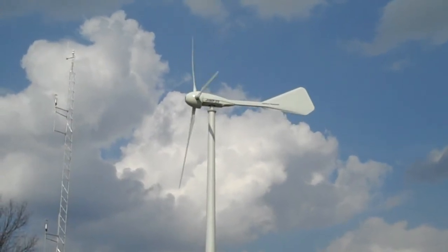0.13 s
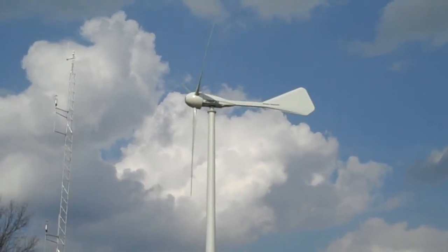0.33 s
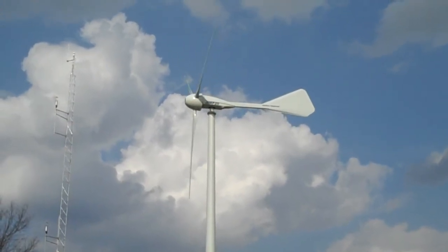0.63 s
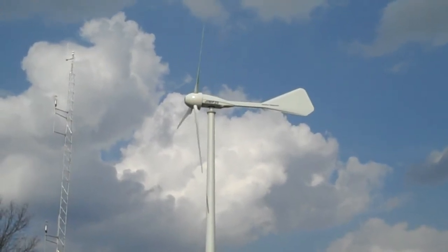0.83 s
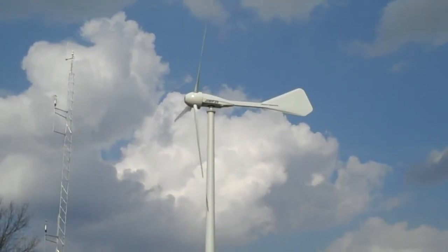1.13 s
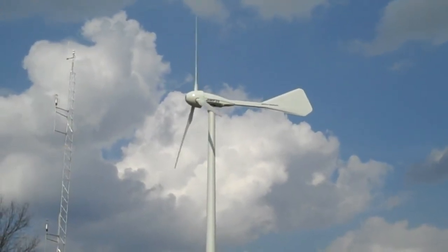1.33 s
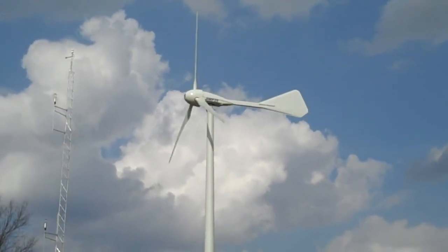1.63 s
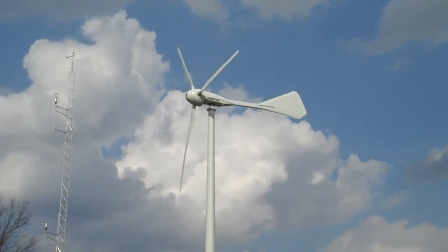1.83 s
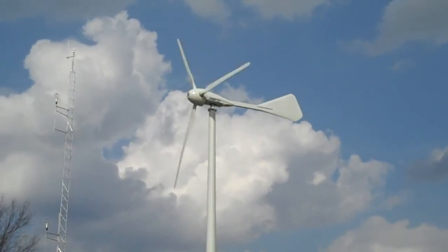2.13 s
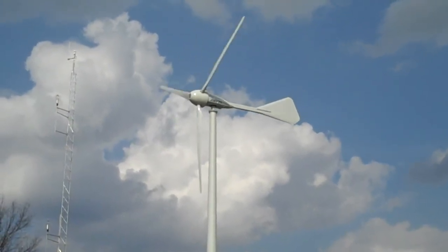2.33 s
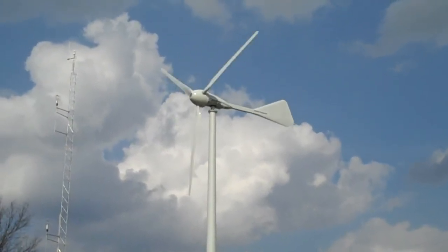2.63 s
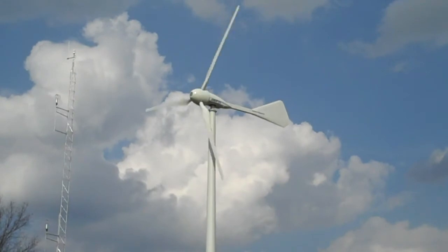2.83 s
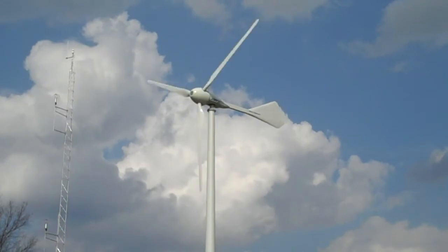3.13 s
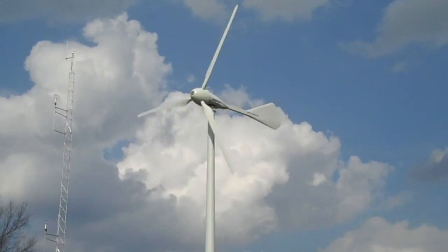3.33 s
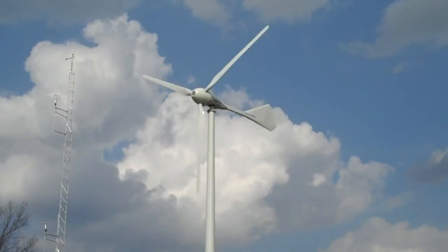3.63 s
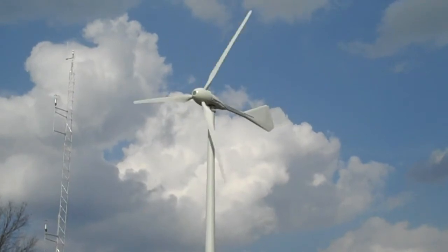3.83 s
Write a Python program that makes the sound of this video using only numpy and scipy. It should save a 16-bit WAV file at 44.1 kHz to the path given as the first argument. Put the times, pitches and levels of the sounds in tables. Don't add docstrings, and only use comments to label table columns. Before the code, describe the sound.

Gusty wind rumbles and flutters against a stereo microphone outdoors, over faint early turbine swishes and bird whistles; the hardest gust makes a sharp click on the left, then it calms and birdsong stands out.

```python
import sys
import numpy as np
from scipy import signal
from scipy.fft import rfft, irfft
from scipy.io import wavfile
from scipy.ndimage import uniform_filter1d, map_coordinates

SR = 44100
rng = np.random.default_rng(int(sys.argv[2]) if len(sys.argv) > 2 else 0)


def master_out(mix):
    frames = np.transpose(np.atleast_2d(mix))
    ceiling = np.clip(frames, -1, 1)
    pcm = np.round(ceiling * 32767).astype(np.int16)
    wavfile.write(sys.argv[1], SR, pcm)


def ratio_of_db(decibels):
    return 10 ** (np.asarray(decibels, float) / 20)


N = 176400


def evened(x):
    return x / np.sqrt(np.mean(x ** 2) + 1e-20)


def read(points, hz):
    f, value = np.transpose(points)
    return np.interp(np.log(hz + 1), np.log(f + 1), value)


def add(mix, s, sound):
    part = mix[:, round(s * SR):][:, :sound.shape[1]]
    part += sound[:, :part.shape[1]]


def smooth_twice(x, span):
    return uniform_filter1d(uniform_filter1d(x, span), span)


def slow(hz, count=N):
    span = max(int(SR / hz), 1)
    return evened(smooth_twice(rng.standard_normal(count), span))


def resonate(x, hz, width):
    turn = np.exp(2j * np.pi * np.cumsum(hz * np.ones(len(x))) / SR)
    r = np.exp(-np.pi * width / SR)
    return 2 * (turn * signal.lfilter([1 - r], [1, -r], x / turn)).real


def ringing_noise(count, hz, width):
    once = resonate(rng.standard_normal(count), hz, width)
    return evened(resonate(once, hz, width))


def buffet(gusts, puffs, flicks, column):
    # t/s, left level/dB, right level/dB
    breeze = [
        (0, -27, -31.5),
        (0.6, -29, -33),
        (0.999, -22, -32),
        (1.619, -22, -33),
        (1.75, -37, -38),
        (2.102, -38, -34),
        (2.35, -35, -25.5),
        (2.6, -37.5, -37),
        (4, -41.5, -39),
    ]
    # f/Hz, level/dB per Hz
    eddy_spectrum = [(15, -13.5), (55, -1.5), (130, -4), (300, -15), (800, -34), (3000, -85)]
    calm_db = -30
    t, table = np.arange(N) / SR, np.array(breeze)
    power = ratio_of_db(2 * (np.interp(t, table[:, 0], table[:, column]) + 2.0 * slow(39)))
    puff_s = .025
    for s, db, wide in gusts + [(s, db, puff_s) for s, db in puffs]:
        power = power + ratio_of_db(2 * db) * np.exp(-(2.2 * (t - s) / wide) ** 2)
    power = power * ratio_of_db(2 * 2.8 * (slow(110) - .7))

    speed = (np.sqrt(power) / ratio_of_db(calm_db)) ** .17 * ratio_of_db(2.5 * slow(60.4))
    flick_s, flick_db = .005, -8.5
    for s, db in flicks:
        snap = np.exp(-((t - s) / flick_s) ** 2)
        speed = speed + 1.5 * ratio_of_db(.3 * (db - calm_db)) * snap
        power = power + ratio_of_db(2 * (db + flick_db)) * snap

    size = 2 * N
    color = ratio_of_db(read(eddy_spectrum, np.fft.rfftfreq(size, 1 / SR)))
    eddies = irfft(rfft(rng.standard_normal(size)) * color, size)
    swept = evened(map_coordinates(eddies, [np.cumsum(speed)], order=2, mode="wrap"))
    local = smooth_twice(swept ** 2, 300)
    return np.sqrt(power) * evened(swept / (abs(local) + 0.018) ** (.6 / 2))


def rumble():
    ports = [evened(resonate(rng.standard_normal(N), 56, 29)) for _ in range(2)]
    return ratio_of_db(-38) * np.array(ports)


def roar():
    # f/Hz, level/dB per Hz
    roar_spectrum = [(150, -6.5), (400, -5), (1100, -11), (3400, -20.5), (5800, -14.5), (8000, -22.5),
                     (10000, -41), (14000, -54)]
    # f/Hz, share/0..1
    likeness = [(300, 1), (1400, 0.96), (4500, 0)]
    frames, hz = N // 128 + 5, np.fft.rfftfreq(512, 1 / SR)
    a, b, c, d, patches = rng.standard_normal((frames, 257, 5)).T
    patches = evened(uniform_filter1d(uniform_filter1d(patches, 6, 0), 16, 1))
    same = np.clip(read(likeness, hz), -1, 1)[:, None]
    left = a + 1j * b
    right = same * left + np.sqrt(1 - same ** 2) * (c + 1j * d)
    in_range = ((hz > 120) & (hz < 14200))[:, None]
    patchy = ratio_of_db(read(roar_spectrum, hz)[:, None] + 2.5 * patches)
    z = np.array([left, right]) * patchy * in_range
    air = signal.istft(z, nperseg=512, noverlap=384)[1][:, :N]
    return ratio_of_db(-42) * evened(air)


def trees():
    level = ratio_of_db(-59 + 0.53 * slow(24))
    return ratio_of_db([[-9], [0]]) * level * ringing_noise(N, 5550, 460)


def blades():
    # f/Hz, width/Hz, level/dB
    swish = [
        (1028, 320, -40),
        (1472, 104, -45.5),
        (1750, 185, -40),
        (1270, 780, -42),
    ]
    passes_per_s, first_pass_s, turn_away_s = 3.5, .18, 1.1
    t = np.arange(N) / SR
    away = .5 - .5 * np.cos(2 * np.pi * passes_per_s * (t - first_pass_s))
    yaw_db = -13 * np.clip((t - turn_away_s) / 0.46, 0, 2)
    level = ratio_of_db(-9 * away ** 2 - 5 * t + yaw_db)
    tones = 0
    for hz, wide, db in swish:
        f = hz * (1 - .1 * away ** 2 + 0.027 * slow(8.8))
        tones = tones + ratio_of_db(db + 3.0 * slow(11)) * ringing_noise(N, f, wide)
    return level * tones


def whistle(hz, db, pan_db, soft_s=.01):
    count = len(hz)
    t = np.arange(count) / SR
    ends = np.clip(np.minimum(t, t[::-1]) / soft_s, 0, 1)
    turns = 2 * np.pi * np.cumsum(hz * (1 + .003 * slow(70, count))) / SR
    fade_db = db + 3.5 + 1.2 * slow(25, count)
    left_db = fade_db + pan_db / 2 + 1.5 * slow(40, count)
    right_db = fade_db - pan_db / 2
    lag = np.pi * (.35 + .3 * rng.random())
    return np.sqrt(2) * ends * ratio_of_db([left_db, right_db]) * np.sin(turns + [[0], [lag]])


def notes_sung(out):
    # start t/s, length/s, first f/Hz, last f/Hz, level/dB
    short_notes = [(.005, .125, 5970, 5830, -52), (1.055, .025, 4220, 3760, -52),
                   (1.08, .025, 3700, 3600, -53), (1.965, .06, 5760, 5500, -50),
                   (2.03, .085, 5850, 5500, -54), (2.2, .24, 5430, 5330, -57),
                   (2.885, .055, 5950, 6260, -53), (3.24, .125, 3580, 3260, -50),
                   (3.41, .04, 2120, 2160, -49), (3.93, .05, 7350, 6910, -51), (3.6, .14, 3550, 3275, -57),
                   (3.86, .065, 4130, 4250, -54), (3.79, .08, 2420, 2330, -54), (3.2, .17, 2350, 2650, -56),
                   (2.8, .04, 4150, 4280, -55), (1.81, .09, 2380, 2330, -56),
                   (2.475, .025, 2370, 2300, -50)]
    for s, length, first_hz, last_hz, db in short_notes:
        add(out, s, whistle(np.linspace(first_hz, last_hz, int(length * SR)), db, -4.1))


def slurs(out):
    # t/s, f/Hz, level/dB
    slur_paths = [
        [(.33, 6240, -58), (.394, 5735, -60), (.42, 5430, -49), (.47, 5120, -58), (.54, 4700, -61),
         (.64, 4300, -54), (.71, 4150, -67), (.77, 3950, -53), (.826, 3915, -51), (.86, 3900, -58),
         (.95, 3620, -56)],
        [(1.19, 7060, -56), (1.24, 6915, -50), (1.26, 6580, -56), (1.316, 5450, -59), (1.36, 4550, -58)],
        [(1.21, 7315, -55), (1.29, 7050, -51), (1.31, 6500, -60), (1.34, 5950, -51), (1.386, 5230, -59),
         (1.514, 4550, -58), (1.545, 4450, -69), (1.6, 4245, -58), (1.616, 4570, -56), (1.65, 4330, -56),
         (1.78, 3900, -56), (1.85, 3740, -62), (1.87, 3420, -55), (1.915, 3330, -55), (2, 3400, -53)],
        [(1.14, 5130, -61), (1.2, 4600, -57), (1.235, 3780, -54), (1.25, 3670, -46), (1.316, 3420, -49),
         (1.34, 3280, -56)],
        [(2.14, 5800, -61), (2.16, 5580, -51), (2.34, 4576, -47), (2.4, 4216, -53), (2.47, 4084, -60)],
    ]
    # t/s, f/Hz, level/dB
    more_slur_paths = [
        [(2.68, 2305, -59), (2.724, 2340, -51), (2.758, 2560, -49), (2.778, 2440, -48), (2.868, 2607, -45),
         (2.9, 2560, -48), (3.01, 2610, -58), (3.025, 2703, -54), (3.1, 2776, -60)],
        [(3.37, 7224, -61), (3.406, 7203, -53), (3.462, 7126, -52), (3.5, 6700, -59), (3.556, 5892, -51),
         (3.62, 5313, -44), (3.652, 5380, -54), (3.682, 4986, -50), (3.74, 4603, -49), (3.766, 4864, -51),
         (3.78, 4670, -51), (3.82, 4400, -62)],
        [(3.015, 3900, -58), (3.044, 3524, -47), (3.08, 3630, -54)],
        [(3.83, 5895, -56), (3.868, 5934, -50), (3.9, 5780, -59), (3.934, 5731, -54), (3.99, 5650, -58)],
        [(1.42, 5536, -64), (1.52, 5460, -58), (1.552, 5520, -45), (1.59, 5531, -43), (1.61, 5466, -57)],
        [(3.13, 4268, -58), (3.186, 4155, -54), (3.22, 4316, -50), (3.238, 4600, -50)],
        [(2.105, 2450, -52), (2.125, 2560, -46), (2.16, 2330, -44), (2.205, 2200, -45), (2.22, 2000, -54)],
    ]
    for rows in slur_paths + more_slur_paths:
        s, hz, db = np.transpose(rows)
        t = np.arange(s[0], s[-1], 1 / SR)
        glide = uniform_filter1d(np.interp(t, s, hz), 350, mode="nearest")
        add(out, s[0], whistle(glide, np.interp(t, s, db), -2.5))


def chips(out):
    # t/s, centre f/Hz, width/Hz, level/dB
    chip_table = [
        (.867, 5100, 800, -41),
        (.868, 7500, 900, -51),
        (.922, 4700, 700, -47),
        (.982, 5500, 1200, -41),
        (.986, 7400, 900, -51),
    ]
    count = int(.045 * SR)
    for s, hz, wide, db in chip_table:
        crackle = rng.standard_normal(count) * (rng.random(count) < .02)
        rasp = evened(resonate(resonate(crackle, hz, wide), hz, wide)) * np.hanning(count)
        high_db = (hz > 6500) * 7
        add(out, s, ratio_of_db([[db - 2 + high_db], [db + 4 - high_db]]) * rasp)


def slam(port):
    t = np.arange(N) / SR - 1.6478
    near = np.exp(-((t + .0002) / .0013) ** 2)
    swing = 2.55 * np.sin(2 * np.pi * 560 * t + .45)
    return port * (1 - near) + near * swing


def arch(length, foot_hz, top_hz, db):
    leap = np.sin(np.linspace(0, np.pi, int(length * SR)))
    return whistle(foot_hz + (top_hz - foot_hz) * leap, db, -2, soft_s=.003)


def warbles(out):
    # start t/s, length/s, foot f/Hz, top f/Hz, level/dB
    warble_table = [
        (2.288, .025, 1990, 2330, -45),
        (2.313, .024, 2130, 2550, -44),
        (2.337, .031, 2300, 2860, -44),
        (2.506, .038, 2050, 2690, -45),
        (2.553, .033, 2100, 2500, -44),
        (2.598, .027, 2000, 2260, -48),
    ]
    for s, *shape in warble_table:
        add(out, s, arch(*shape))


def trill(out):
    start_s, per_s, beats = 3.2375, 57, 11
    for beat in range(beats):
        left = 1 - beat / beats
        foot_hz = 3850 + 300 * left
        top_hz = foot_hz + 280 + 850 * left ** 2.5
        db = -41.5 - 32 * (left - .68) ** 2
        add(out, start_s + beat / per_s, arch(1 / per_s, foot_hz, top_hz, db))


def birds():
    out = np.zeros((2, N))
    for song in (notes_sung, slurs, chips, warbles, trill):
        song(out)
    tail = rng.standard_normal((2, 6000)) * ratio_of_db(-60 * np.arange(6000) / SR / .2)
    echo = signal.fftconvolve(out, tail / np.linalg.norm(tail[0]), axes=1)[:, :N]
    return out + ratio_of_db(-11) * echo


def duck_db(wind):
    power_db = 10 * np.log10(abs(uniform_filter1d((wind ** 2).max(0), 900)) + 1e-12)
    t = np.arange(N) / SR
    fall = t * 44.0
    held_db = np.maximum.accumulate(power_db + fall) - fall
    over_db = np.maximum(held_db + 15.0, 0)
    return 1.13 * uniform_filter1d(over_db, 800) - 0.6 * t


def scene():
    # t/s, level/dB, width/s
    gusts_left = [(0.016, -15.0, 0.031), (0.661, -11.0, 0.025), (0.706, -15.5, 0.03367),
                  (0.801, -14.5, 0.031), (0.935, -10.0, 0.084), (1.086, -9.5, 0.035), (1.302, -14, 0.014),
                  (1.352, -7.0, 0.062), (1.4, -9, 0.016), (1.486, -18, 0.016), (1.516, -13.0, 0.045),
                  (1.546, -14, 0.015), (1.652, -6.0, 0.028), (2.377, -24.5, 0.038), (2.429, -23.5, 0.054),
                  (2.954, -24.0, 0.033), (3.087, -17, 0.035)]
    gusts_right = [(0.489, -14, 0.031), (0.583, -11.5, 0.036), (0.967, -16.0, 0.052), (1.133, -16.0, 0.06),
                   (1.811, -18, 0.065), (2.051, -18.5, 0.033), (2.145, -22.5, 0.02), (2.194, -23.0, 0.033),
                   (2.243, -19.0, 0.023), (2.289, -15.5, 0.015), (2.372, -15.5, 0.097),
                   (2.72, -20.0, 0.0242), (3.014, -21.0, 0.027), (3.277, -23.5, 0.024),
                   (3.378, -21.5, 0.021), (3.454, -14, 0.035), (3.684, -25.5, 0.064)]
    # t/s, level/dB
    puffs_left = [(0.097, -17), (0.226, -18.5), (.27, -22), (.457, -20), (.519, -21), (.599, -22),
                  (1.003, -17), (1.254, -19), (2.86, -27), (3.425, -27)]
    puffs_right = [(.022, -23), (.056, -24.5), (0.095, -25.5), (0.266, -21), (.737, -24.5), (.906, -24.5),
                   (1.303, -20), (1.369, -21), (1.573, -24), (1.602, -24), (2.498, -24), (2.571, -26),
                   (3.214, -26.5), (3.923, -28), (3.995, -20)]
    # t/s, level/dB
    flicks_left = [(0.66, -12), (0.935, -7), (0.94, -12.5), (1.075, -22), (1.341, -8), (1.363, -13),
                   (1.381, -15.5), (1.408, -13), (1.515, -10.5), (1.544, -15), (1.645, -11), (1.651, -10.5),
                   (1.658, -11)]
    flicks_right = [
        (0.485, -17),
        (0.579, -13),
        (0.97, -18.5),
        (1.791, -22),
        (2.381, -25.5),
        (3.015, -22),
    ]
    left = buffet(gusts_left, puffs_left, flicks_left, column=1)
    right = buffet(gusts_right, puffs_right, flicks_right, column=2)
    wind = 1.15 * np.tanh(np.array([left, right]) / 1.15)
    ducked_db = duck_db(wind)
    wind[0] = slam(wind[0])
    far = roar() + trees() + blades()
    return wind + rumble() + birds() + far / ratio_of_db(ducked_db)


def overload(x):
    return np.where(x > 1.25, -.98, np.clip(x, -.99, .99))


def top_cut(x):
    return signal.sosfilt(signal.butter(12, 14300, fs=SR, output="sos"), x)


def record(dry):
    cut = signal.lfilter(*signal.butter(1, 30, "high", fs=SR), dry)
    return top_cut(overload(cut))


dry = scene()
out = record(dry)
master_out(out)
```